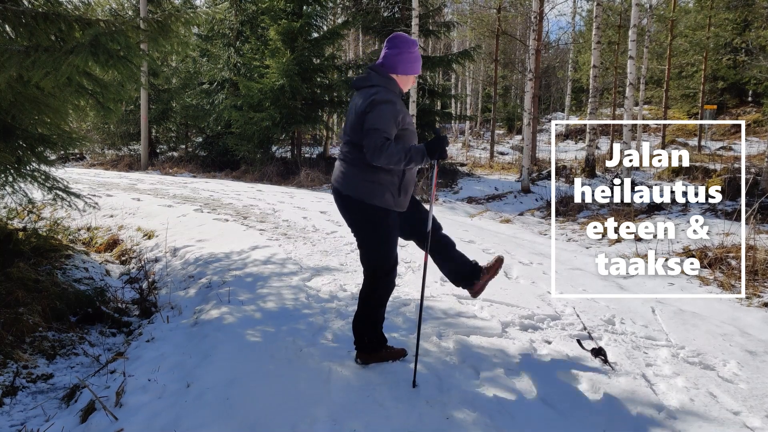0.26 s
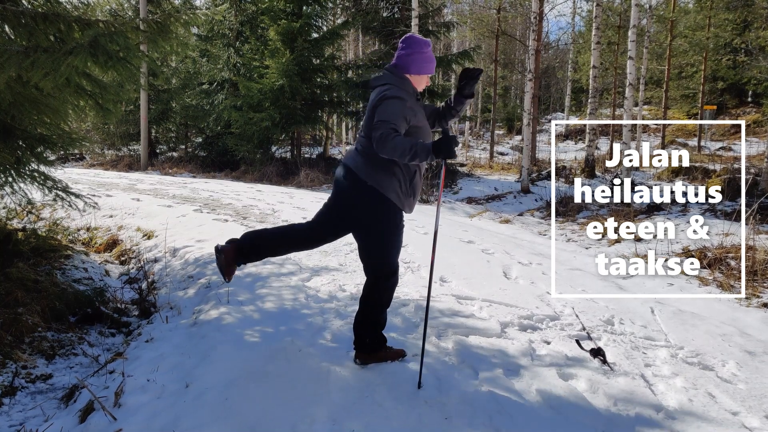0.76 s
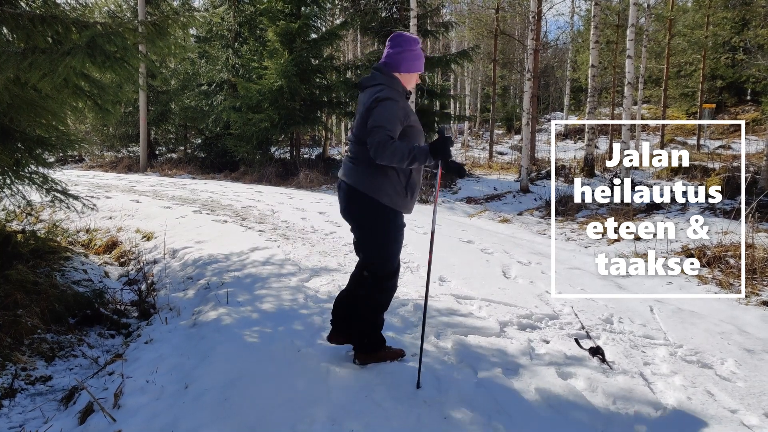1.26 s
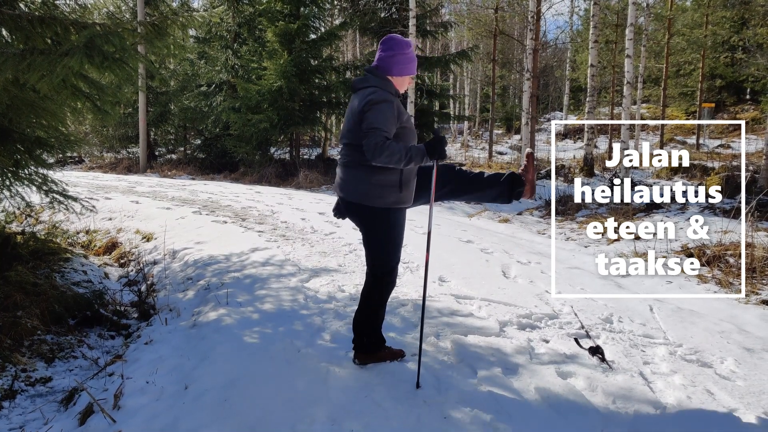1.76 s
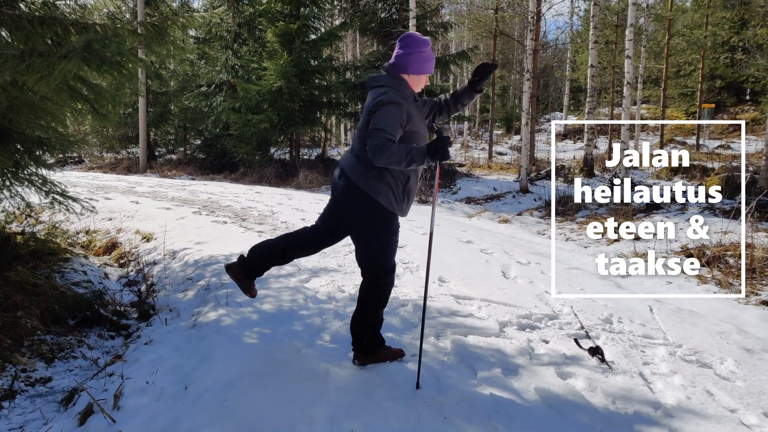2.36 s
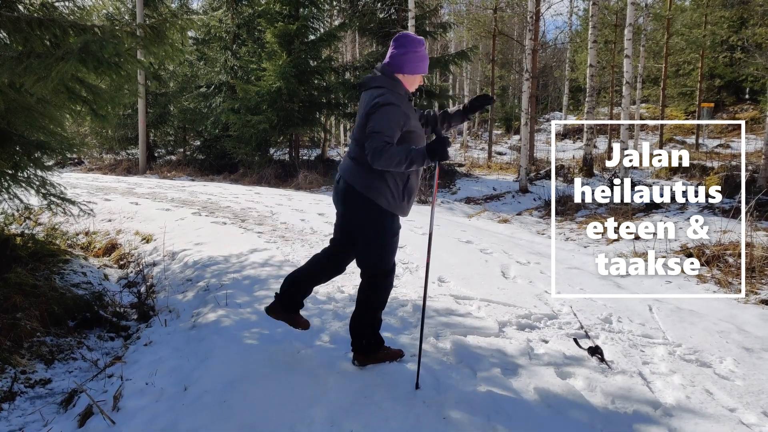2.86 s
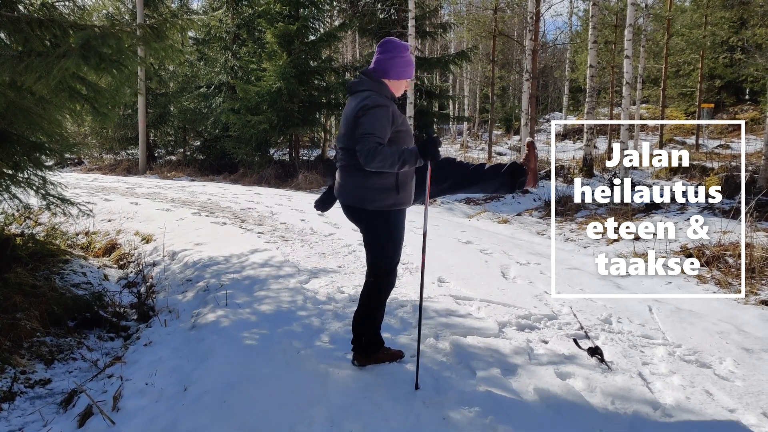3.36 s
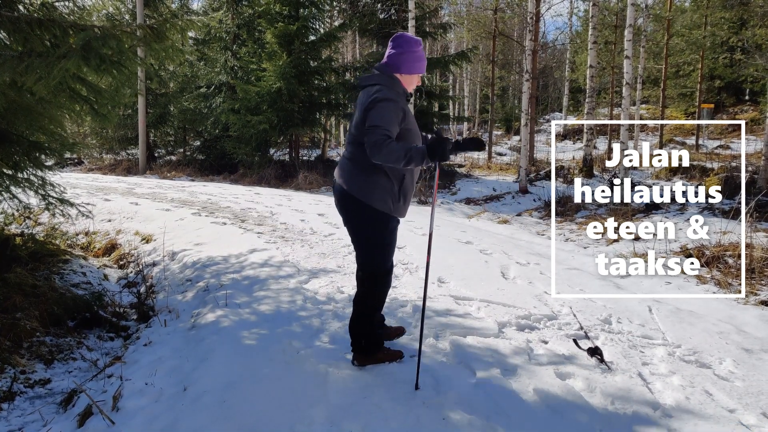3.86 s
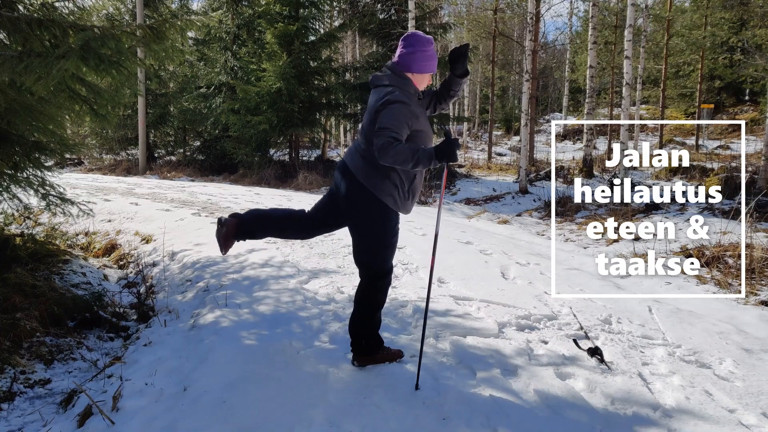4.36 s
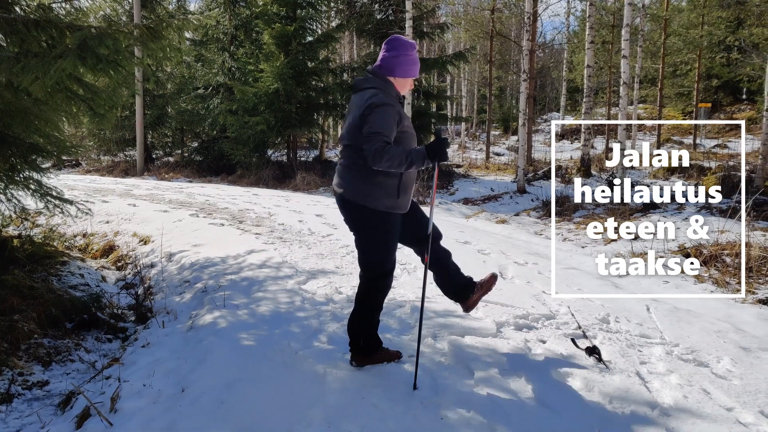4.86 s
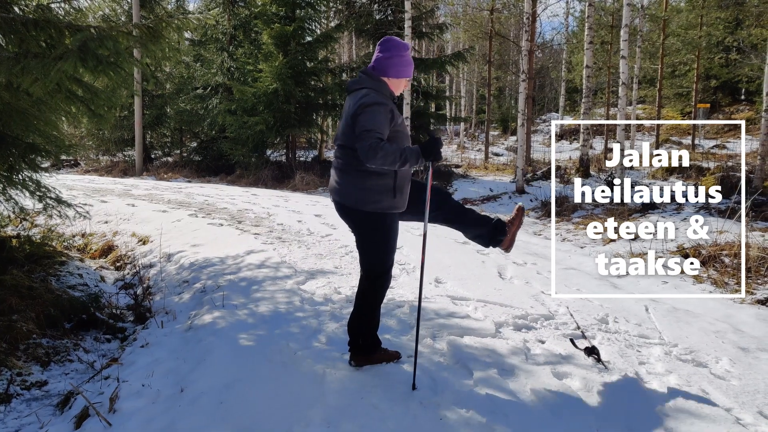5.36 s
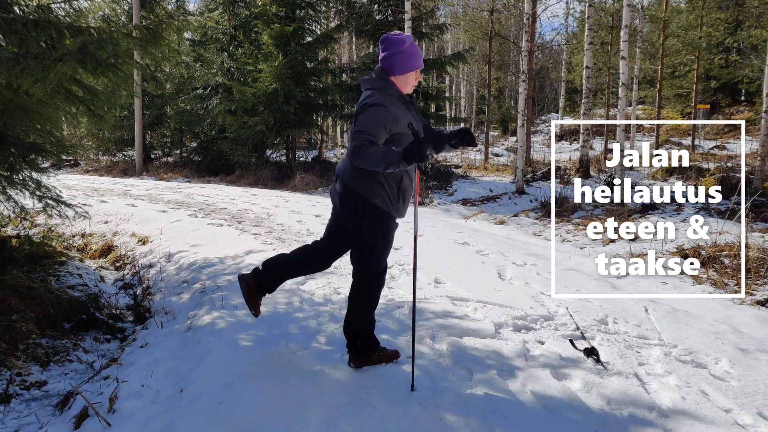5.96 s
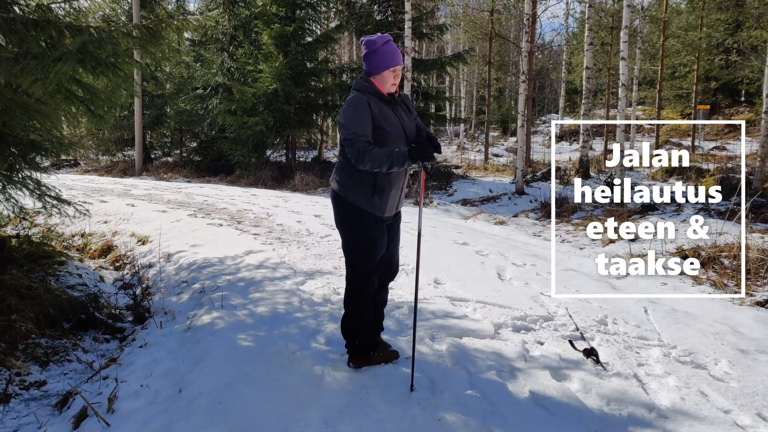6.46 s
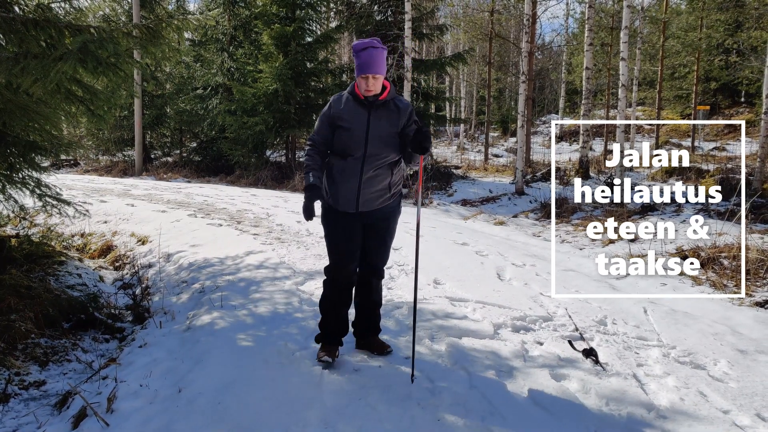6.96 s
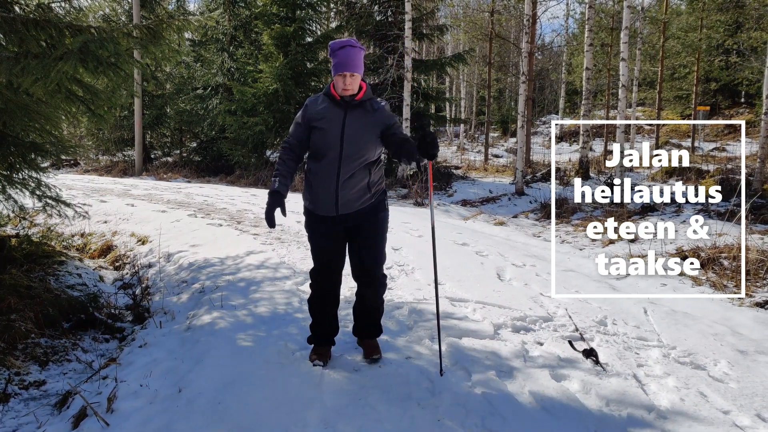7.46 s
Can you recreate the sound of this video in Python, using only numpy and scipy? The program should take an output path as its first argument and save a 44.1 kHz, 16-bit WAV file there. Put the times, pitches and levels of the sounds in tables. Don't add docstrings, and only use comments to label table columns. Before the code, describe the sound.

Outdoors in a wood, a nearby small bird sings five quick falling two-note whistles while low wind bumps shake the right side and a pole taps twice. The song stops; faint thin bird calls answer far off. Nine more phrases follow, growing louder, then only soft rustling, distant whistles and hiss remain. Stereo microphone, right side open, left muffled with small ticks.

```python
import sys
import numpy as np
from scipy import signal
from scipy.fft import rfft, irfft
from scipy.io import wavfile
from scipy.ndimage import uniform_filter1d, map_coordinates

SR = 44100
rng = np.random.default_rng(int(sys.argv[2]) if len(sys.argv) > 2 else 0)


def output_pcm(signal):
    pcm = np.clip(np.atleast_2d(signal).T, -1, 1) * 32767
    wavfile.write(sys.argv[1], SR, np.round(pcm).astype(np.int16))


def gain_from_db(level_db):
    decades = np.asarray(level_db, float) / 20
    return 10 ** decades


N = 339981

# (time [s], extra scatter from the trees [dB], overtone level [dB])
HEAD_TURNS = [(0, 1, -48), (.35, 3, -50), (.7, -2, -47), (.85, 1, -49), (1.0, 4, -52), (1.2, 3, -52),
              (1.4, -2, -46), (1.55, 0, -52), (3.25, -3.5, -44), (3.7, -1, -48), (3.95, -4, -58),
              (4.3, -1, -52), (4.6, -2.5, -50), (4.75, -3.5, -33), (5.0, -5, -45), (5.5, -3, -48),
              (5.75, -4.5, -47), (6.06, -7, -41), (6.2, -4.5, -41)]


def in_time(rows):
    s, *columns = np.transpose(rows)
    return [np.interp(np.arange(N) / SR, s, c) for c in columns]


def rms_one(x):
    return x / np.sqrt(np.mean(x ** 2) + 1e-20)


def lowpass(x, hz, order):
    return signal.sosfilt(signal.butter(order, hz, fs=SR, output="sos"), x)


def band(x, low_hz, high_hz, order=2):
    edges = np.clip([low_hz, high_hz], 5, .45 * SR)
    return signal.sosfilt(signal.butter(order, edges, "band", fs=SR, output="sos"), x)


def drift(rate):
    steps = rng.standard_normal(400)
    return map_coordinates(steps, [np.arange(N) / SR * rate + 2], order=3)


def coloured(spectrum):
    hz, level_db = np.transpose(spectrum)
    bins = np.maximum(np.arange(N // 2 + 1) * SR / N, 40)
    density_db = np.interp(np.log(bins), np.log(hz), level_db) - 100
    shape = gain_from_db(density_db) * np.sqrt(SR / 2)
    return irfft(rfft(rng.standard_normal(N)) * shape, N)


def steady(x, span_s):
    power = uniform_filter1d(x ** 2, size=round(span_s * SR))
    return x / np.sqrt(power + .05 * np.mean(power))


def add(out, piece, at_s):
    start = round(at_s * SR) - len(piece) // 2
    low, high = np.clip([start, start + len(piece)], 0, N)
    out[low:high] += piece[low - start:][:high - low]


def impulses(rows):
    clicks = np.zeros(N)
    for s, peak_db in rows:
        clicks[round(s * SR)] = gain_from_db(peak_db)
    return clicks + 1e-18


def pushes(rows):
    t = np.arange(N) / SR
    return sum(sign * gain_from_db(peak_db) * np.exp(-((t - s) / width) ** 2) for s, peak_db, sign, width in rows)


def birds():
    # (share of length, pitch ratio, level below the peak [dB])
    high_shape = [(0, 1.504, -15), (.15, 1.32, -9), (.34, 1.17, -9), (.54, 1.045, -2), (.79, 1, 0.5),
                  (.93, 1, 0.5), (1, 1.015, -10)]
    # (time [s], length [s], pitch [Hz], peak level [dB], swell from start to end [dB])
    high_notes = [(-.041, 0.062, 5300, -27.5, -12), (0.299, 0.064, 5430, -32.5, 5),
                  (0.638, 0.067, 5314, -30, 0), (0.996, 0.062, 5260, -30, -1),
                  (1.352, 0.051, 5376, -30.5, 0.5), (3.193, 0.06, 5340, -36, -1),
                  (3.522, 0.058, 5220, -32.5, -0.5), (3.879, 0.05, 5200, -30.5, 0),
                  (4.226, 0.067, 5320, -31.5, -5), (4.589, 0.057, 5190, -30.5, -1.5),
                  (4.932, 0.065, 5326, -24.5, -1), (5.3, .061, 5257, -26, -5.3),
                  (5.665, 0.056, 5290, -28, 1), (6.033, 0.061, 5320, -25, -3)]
    # (share of length, pitch ratio, level below the peak [dB])
    low_shape = [(0, 1.115, -15), (.07, 1.055, -8), (.15, 1.035, -4), (.3, 1, 0), (.5, .958, -3),
                 (.75, .908, -7), (1, .866, -11)]
    # (time [s], length [s], pitch [Hz], peak level [dB], swell from start to end [dB])
    low_notes = [(0.058, 0.135, 4830, -38, -3), (0.4, 0.132, 4800, -33.5, 1),
                 (0.749, 0.15, 4726, -34, -3.5), (1.099, 0.14, 4697, -35, -2.5),
                 (1.454, 0.15, 4690, -34, -3), (3.298, 0.118, 4830, -37.5, 1.5),
                 (3.627, 0.15, 4670, -39.5, -0.5), (3.977, 0.13, 4715, -31.5, -1),
                 (4.33, 0.14, 4807, -31.5, -2.5), (4.694, 0.13, 4727, -32, 1.5),
                 (5.039, 0.14, 4728, -28, -0.5), (5.407, 0.14, 4787, -30, -0.5),
                 (5.771, 0.15, 4820, -28.5, 1), (6.145, 0.13, 4725, -27.5, -4)]
    # (share of length, pitch ratio, level below the peak [dB])
    hook_shape = [(0, .6, -24), (.1, 1.015, -6), (.55, 1, 0), (.75, .96, -4), (.9, .88, -11), (1, .8, -20)]
    # (time [s], length [s], pitch [Hz], peak level [dB], swell from start to end [dB])
    hooks = [
        (1.914, 0.07, 7720, -57, 2),
        (2.046, .062, 7430, -56, 0),
    ]
    # (share of length, pitch ratio, level below the peak [dB])
    slide_shape = [(0, 1.095, -7), (.16, 1.045, -2), (.4, 1, 0.5), (.84, .935, -2), (.93, .9, -4),
                   (1, 0.8, -10)]
    # (time [s], length [s], pitch [Hz], peak level [dB], swell from start to end [dB])
    slides = [
        (2.609, 0.13, 6440, -59, 1),
        (2.848, 0.14, 5980, -66, 3),
        (3.07, 0.04, 5600, -73, 3),
        (6.878, .11, 6300, -63, 1),
        (7.091, 0.16, 6200, -60.5, 2),
        (7.313, 0.058, 5850, -66, 1),
    ]
    near = np.zeros(N)
    head_s, _, overtone_db = np.transpose(HEAD_TURNS)
    for shape, notes, release_s, chip_below_db in [(high_shape, high_notes, .002, -32),
                                                   (low_shape, low_notes, .006, -29)]:
        for row in notes:
            s, peak_db = row[0], row[3]
            facing_db = np.interp(s, head_s, overtone_db)
            chip_db = peak_db + chip_below_db + 0.3 * (facing_db + 59)
            add(near, *whistle(sung(shape, *row), .0024, facing_db, release_s))
            chip = [(s - .006, 6400, chip_db), (s - .003, 7900, chip_db)]
            add(near, *whistle(chip, fade_s=.00027, overtone_db=-60, release_s=.0011))
            if shape is low_shape:
                upswing = [(s - .005, 4300, chip_db - 4), (s, 5300, chip_db + 1)]
                add(near, *whistle(upswing, fade_s=.0008, overtone_db=-60, release_s=.001))
    wavering = np.arange(N) + 3.5 * drift(35)
    near = map_coordinates(near, [wavering], order=3)
    near *= gain_from_db(1.8 * drift(45))
    far = np.zeros(N)
    for shape, notes in [(hook_shape, hooks), (slide_shape, slides)]:
        for row in notes:
            add(far, *whistle(sung(shape, *row), fade_s=.003, overtone_db=-60))
    return near + far * gain_from_db(3 * drift(50))


def sung(shape, s, length, pitch_hz, peak_db, swell_db):
    share, ratio, level_db = np.transpose(shape)
    swell = swell_db * (2 * share - 1)
    return np.transpose([s + length * share, pitch_hz * ratio, peak_db + level_db + swell])


def whistle(note, fade_s, overtone_db, release_s=0.0038):
    # (time [s], width [s], pitch shift [Hz], level shift [dB])
    slips = [(0.318, 0.02, -170, -2), (.41, 0.011, 289, 3), (.703, 0.0058, 130, -8),
             (.752, 0.0061, -160, 2), (.812, 0.0055, -37, -4), (1.02, 0.017, 159, 1),
             (1.114, 0.0057, -120, 4), (1.137, .014, -46, -1.5), (1.41, 0.0084, 250, 15),
             (3.203, .01, -300, -7.5), (3.541, 0.011, 66, -7.5), (3.705, 0.013, 73, 5.5),
             (3.742, 0.0093, -110, 1.5), (3.889, 0.0096, -170, -5), (3.934, 0.0039, 373, 21),
             (4.013, 0.012, -130, 0), (4.041, 0.014, 76, 2), (4.243, 0.011, -170, 0),
             (4.342, 0.034, -16, -10), (4.597, 0.0083, -270, 0), (4.618, 0.012, 172, 2.5),
             (4.698, 0.0094, -170, 3), (4.951, 0.006, -150, -3), (5.417, 0.007, -210, -8),
             (5.48, 0.0096, 60, 2.5), (6.055, 0.013, -150, -2), (6.097, 0.0059, 200, 6),
             (6.148, 0.01, -120, -4), (6.168, 0.021, 210, -2.2), (1.103, 0.0044, 250, 4),
             (1.113, 0.0035, 0, -8), (1.126, 0.0056, 227, 3.5), (3.68, 0.011, -87, 1.5),
             (4.09, 0.018, 57, 3), (.52, .01, -40, -8), (.76, .008, 2, -4), (3.765, .012, 0, 4),
             (3.302, .006, 250, 2), (.525, .025, 80, 0), (.88, .025, 90, 0), (3.74, .012, 58, 1),
             (4.058, .008, -58, -1), (5.771, 0.0096, 202, 4), (5.43, 0.013, 60, -1), (5.17, 0.0037, 0, -4),
             (3.556, 0.0049, 0, -3.5), (5.361, 0.0034, 150, 7), (5.72, 0.0049, 100, 1.5),
             (3.585, 0.0035, 100, -2), (5.85, 0.016, 4, 4)]
    s, hz, level_db = np.transpose(note)
    t = np.arange(s[0] - fade_s, s[-1] + 5 * release_s, 1 / SR)
    at, width, shift_hz, shift_db = np.transpose(slips)
    slipping = np.exp(-((t[:, None] - at) / width) ** 2)
    glide = uniform_filter1d(np.interp(t, s, hz) + slipping @ shift_hz, size=160)
    phase = 2 * np.pi * np.cumsum(glide) / SR
    attack = np.clip((t - t[0]) / (2 * fade_s), 0, 1) ** 2
    release = np.exp(-np.maximum(t - s[-1], 0) / release_s)
    tone = np.sin(phase) + gain_from_db(overtone_db) * np.sin(2 * phase)
    level = np.sqrt(2) * gain_from_db(np.interp(t, s, level_db) + slipping @ shift_db)
    return level * attack * release * tone, t.mean()


def trees(x):
    # (time [s], width [s], lag [s], level [dB])
    trunk_echoes = [
        (1.058, .012, .078, -7),
        (1.125, .035, .011, -2),
        (3.66, .03, .06, -11),
        (3.7, .03, .09, -14),
        (1.96, .03, .012, -4),
    ]
    wash_t60_s, linger_t60_s, bloom_s = 0.66, 0.55, .012
    wash_db, linger_db, near_echo_db = -3.2, -6, -9
    t = np.arange(SR) / SR
    wash = rng.standard_normal(SR) * gain_from_db(-60 * t / wash_t60_s) * (1 - np.exp(-t / 0.0031))
    highs_left = gain_from_db(-60 * t / 1.5)
    wash = wash * highs_left + band(wash, 300, 4700) * (1 - highs_left)
    wash = wash - 0.62 * band(wash, 4200, 5130, order=1)
    lows = rng.standard_normal(SR) * gain_from_db(linger_db - 60 * t / linger_t60_s) * (1 - np.exp(-t / 0.023))
    wash = wash + band(lows, 4020, 4330)
    early = rng.standard_normal(SR) * (rng.random(SR) < .03) * gain_from_db(-60 * t / .12)
    early = early * (1 - np.exp(-t / bloom_s))
    answer = gain_from_db(wash_db) * wash / np.linalg.norm(wash)
    answer = answer + gain_from_db(near_echo_db) * early / np.linalg.norm(early)
    answer = answer - .66 * band(answer, 5100, 5550, order=1)
    answer = answer - 0.2 * band(answer, 6800, 8800, order=1)
    scattered = signal.fftconvolve(x * gain_from_db(in_time(HEAD_TURNS)[0]), answer)[:N]
    swaying = np.arange(N) + 2.5 * drift(48)
    out = x + map_coordinates(scattered, [swaying], order=3)
    now = np.arange(N) / SR
    for s, width, lag, echo_db in trunk_echoes:
        moment = x * np.exp(-((now - s) / width) ** 2)
        out += gain_from_db(echo_db) * np.roll(moment, round(lag * SR))
    return out


def chatter():
    # (time [s], length [s], start pitch [Hz], end pitch [Hz], peak level [dB])
    chirps = [(0.265, 0.065, 2940, 3910, -53.5), (0.324, 0.053, 3190, 4030, -49.5),
              (0.402, 0.056, 2980, 3900, -51), (0.47, 0.048, 2900, 3700, -55),
              (.545, 0.053, 2990, 3750, -55.5), (0.612, .035, 2800, 3340, -57),
              (.655, 0.06, 3080, 3670, -57), (4.15, 0.05, 3170, 4000, -61), (4.227, 0.046, 3230, 4100, -60),
              (4.295, 0.06, 3200, 3950, -61), (2.179, 0.036, 3500, 4440, -61),
              (2.242, .03, 3500, 4200, -63), (.262, .04, 2300, 3000, -58), (.55, .04, 2300, 2900, -59),
              (.335, .03, 3700, 4300, -56), (.635, .04, 3300, 3900, -60)]
    blur_hz = 300
    out, draws = np.zeros(N), rng.standard_normal((len(chirps), 2, 6000))
    for (s, length, start_hz, end_hz, peak_db), noise in zip(chirps, draws):
        size = round(1.7 * length * SR)
        tear = rms_one(lowpass(noise, blur_hz, 2))[:, -size:]
        phase = 2 * np.pi * np.cumsum(np.linspace(start_hz, end_hz, size)) / SR
        chirp = tear[0] * np.sin(phase) + tear[1] * np.cos(phase)
        add(out, gain_from_db(peak_db) * chirp * np.hanning(size), s)
    return out


def rustles():
    # (time [s], length [s], centre
    # [Hz], width [Hz], peak level [dB])
    puffs = [(.83, .008, 6600, 700, -55), (0.334, .02, 2300, 600, -60), (0.554, .03, 2400, 700, -60),
             (.55, .03, 6000, 4000, -54), (2.32, .05, 5000, 2500, -62), (6.481, .016, 5800, 4000, -59),
             (6.7, .06, 6570, 4000, -65), (6.86, .04, 6000, 3500, -65), (7.18, .06, 6500, 4500, -65),
             (3.235, 0.012, 3300, 2000, -57), (2.27, 0.28, 5500, 4600, -67), (4.549, 0.14, 3240, 1300, -64),
             (4.996, 0.041, 9000, 9000, -61), (5.006, 0.056, 3240, 1530, -59),
             (5.305, 0.011, 9900, 8000, -58), (6.766, 0.055, 6150, 4500, -55),
             (6.955, 0.41, 6960, 4000, -65), (7.518, 0.022, 7660, 8000, -59.5),
             (7.664, 0.024, 6500, 5000, -58.5), (3.28, .04, 3200, 1600, -63),
             (4.688, .006, 7200, 1800, -48), (6.139, .006, 6900, 3400, -49), (1.454, .006, 7400, 1600, -53),
             (1.377, .008, 7400, 1400, -53), (1.005, .006, 5200, 2600, -53), (.992, .008, 7000, 2400, -56),
             (1.262, .006, 6800, 3400, -59), (4.327, .006, 7900, 3000, -52), (3.62, .008, 7400, 1400, -54),
             (3.515, .008, 7000, 1800, -55), (.151, .005, 6000, 5000, -56), (5.293, .008, 6800, 2200, -52),
             (2.045, .006, 5500, 4000, -62), (5.345, .006, 3600, 2400, -56)]
    out, draws = np.zeros(N), rng.standard_normal((len(puffs), 2, 30000))
    for (s, length, hz, width_hz, peak_db), (noise, grain) in zip(puffs, draws):
        size = min(round(2 * length * SR), 30000)
        grainy = noise * gain_from_db(4.4 * grain)
        puff = rms_one(band(grainy, hz - width_hz / 2, hz + width_hz / 2, order=3))
        add(out, gain_from_db(peak_db) * puff[-size:] * np.hanning(size), s)
    return out


def taps():
    # (time [s], peak level [dB])
    pole_clicks = [
        (.151, -22.5),
        (0.164, -24),
    ]
    clicks = impulses(pole_clicks)
    return 14 * band(clicks, 620, 1300) + 7 * band(clicks, 2260, 2550)


def buffets():
    # (time [s], peak level [dB], centre [Hz], width [s])
    eddies = [(0.091, -18, 152, 0.017), (0.153, -24, 154, 0.0066), (0.197, -12.5, 137, 0.023),
              (0.242, -17.5, 132, 0.0097), (0.266, -7.5, 143, 0.015), (0.287, -7.5, 291, 0.011),
              (0.301, -8.5, 170, 0.02), (0.328, -11.5, 139, 0.011), (0.411, -10, 120, 0.013),
              (0.435, -17.5, 200, 0.013), (0.468, -22.5, 101, 0.0093), (0.566, -23.5, 135.5, 0.0097),
              (0.625, -16, 128, 0.0094), (0.667, -21.5, 151, 0.013), (0.715, -16.5, 270, 0.011),
              (0.728, -11, 104.7, 0.022), (0.797, -26, 102, 0.019), (1.119, -32.5, 132, 0.029),
              (1.193, -24.5, 119.5, 0.02), (1.346, -27, 93, 0.017), (1.409, -24.5, 135, 0.0093),
              (1.499, -29, 87, 0.022), (1.714, -29, 106, 0.016), (1.761, -15.5, 234, 0.0067),
              (1.777, -16.5, 105.4, 0.011), (1.954, -25, 140, 0.011), (2.783, -32, 101, 0.013),
              (3.767, -52, 91, 0.022), (5.246, -37, 116, 0.041), (5.57, -39, 141, 0.0093),
              (6.9, -48, 149, .03), (7.2, -44.5, 167, 0.034), (2.1, -41, 100, 0.021)]
    out, draws = np.zeros(N), rng.standard_normal((len(eddies), 9000))
    for (s, peak_db, hz, width), noise in zip(eddies, draws):
        size = round(2.2 * width * SR)
        cycles = steady(band(noise, 0.752 * hz, 1.218 * hz), 1 / hz)
        edge = rms_one(band(noise, 1.95 * hz, 2.336 * hz, order=3))
        shake = (cycles + gain_from_db(-17.0) * edge)[-size:] * np.hanning(size)
        add(out, gain_from_db(peak_db) * shake / np.abs(shake).max(), s)
    return lowpass(out, 620, 4)


def shoves():
    # (time [s], peak level [dB], sign, width [s])
    swings = [
        (1.743, -26, -1, .004),
        (1.751, -21, 1, .004),
        (1.947, -19, -1, .002),
        (2.093, -30, -1, .004),
        (2.101, -27, 1, .004),
        (1.825, -29, -1, .005),
        (1.769, -24, -1, .002),
        (1.72, -30, -1, .003),
    ]
    return pushes(swings)


def covered_port():
    # (time [s], peak level [dB], sign, width [s])
    presses = [
        (2.768, -21, -0.92, 0.0029),
        (2.779, -18.5, 0.78, 0.0051),
        (3.167, -14.5, 0.7, 0.0029),
        (5.592, -21.5, 0.62, 0.0028),
        (.69, -38, 1, .0015),
        (.74, -41, -1, 0.0019),
        (1.241, -33, 1, .002),
        (5.1, -40, 1, .0018),
        (5.62, -39, -0.8, 0.0013),
    ]
    # (time [s], peak level [dB])
    ticks = [
        (3.656, -46),
        (3.670, -31),
        (3.991, -22),
        (5.995, -31.5),
        (6.877, -40),
    ]
    port_hz, ring_t60_s = 14800, 0.0015
    clicks = impulses(ticks)
    r, w = gain_from_db(-60 / (ring_t60_s * SR)), 2 * np.pi * port_hz / SR
    ring = signal.lfilter([1, -.5], [1, -2 * r * np.cos(w), r * r], clicks)
    step = signal.lfilter([.35], [1, -.985], clicks)
    return pushes(presses) + 0.94 * ring + step


def gusting():
    # (time [s], left rms level [dB], right rms level [dB])
    slow_wind = [(0, -34.5, -33.5), (.2, -45, -24), (.7, -31.5, -28.5), (.98, -41.5, -40.5),
                 (1.2, -29.5, -31.5), (1.54, -46, -39.5), (1.8, -37, -34.5), (2.1, -40.5, -39),
                 (2.5, -43, -49), (3.0, -49.5, -51.5), (3.5, -38, -51), (4.2, -43.5, -51),
                 (4.8, -40.5, -42.5), (5.3, -35, -44.5), (5.9, -38.5, -48), (6.4, -48.5, -50),
                 (7.0, -51, -54), (7.71, -60, -52)]
    # (time [s], width [s], left rise [dB], right rise [dB])
    gusts = [
        (2.75, 0.089, 4, 10),
        (3.21, 0.091, 13, 5),
        (3.779, 0.068, 3.5, 21.5),
        (4.06, 0.017, 13.5, 12),
        (5.18, 0.13, 1.5, 9),
        (5.6, 0.098, 12.5, 8),
        (6.02, 0.098, -6, 4.5),
        (6.3, 0.12, 11, -4),
        (7.14, 0.045, 3, 7),
        (7.5, 0.3, 13.5, 1.5),
    ]
    level_db, t = np.array(in_time(slow_wind)), np.arange(N) / SR
    for s, width, left_db, right_db in gusts:
        level_db = level_db + np.outer([left_db, right_db], np.exp(-((t - s) / width) ** 2))
    return level_db


def wind(level_db, low_hz, top_hz, knee_hz):
    rumble = band(rng.standard_normal(N + SR), low_hz, top_hz, order=1)
    rumble = lowpass(rumble, knee_hz, 2)[SR:]
    lumps = gain_from_db(2.5 * drift(18))
    return gain_from_db(level_db) * rms_one(steady(rumble, 0.16) * lumps)


def forest(gain):
    # (frequency [Hz], level per Hz [dB])
    murmur_spectrum = [(60, 3), (150, 17.5), (330, 18), (600, 18), (1200, 13), (2200, 4.5), (3500, 0.5),
                       (6500, -0.5), (8200, -3), (9000, -8.5), (12500, -8), (15000, -8.5), (15790, -8),
                       (15830, -61)]
    # (time [s], width [s], share lost)
    lulls = [
        (1.86, 0.15, 0.52),
        (2.72, 0.23, 0.68),
        (4.52, 0.085, 0.45),
    ]
    murmur, t = coloured(murmur_spectrum), np.arange(N) / SR
    lost = sum(share * np.exp(-((t - s) / width) ** 2) for s, width, share in lulls)
    haze = band(murmur, 3800, 13400, order=1)
    return gain ** 1.06 * (murmur - lost * haze)


def road(road_db):
    hum = rms_one(band(rng.standard_normal(N), 245, 488))
    return gain_from_db(road_db - 0.5) * hum * gain_from_db(2.0 * drift(6))


def scene():
    # (time [s], gain heard as hiss level [dB], far road hum level [dB])
    floor = [(0, -69.5, -52.5), (.29, -69.5, -41.5), (.57, -68.5, -49.5), (1.14, -69.5, -53.5),
             (1.43, -68, -57), (1.71, -67, -52), (2.28, -70, -51.5), (2.57, -71.5, -59), (2.86, -71, -59),
             (3.14, -72, -56.5), (3.43, -69.5, -53), (4.3, -70, -52.5), (4.85, -69, -52),
             (5.71, -68.5, -45.5), (6.28, -70, -49.5), (6.57, -72.5, -52.5), (6.85, -73, -54.5),
             (7.71, -73, -54)]
    # (frequency [Hz], level per Hz [dB])
    hiss_spectrum = [(60, 17.5), (150, 9.5), (330, 1.5), (600, -2), (1200, -5.5), (2200, -8.5), (3500, -10),
                     (4500, -19), (5500, -27), (6800, -15), (8000, -12.5), (12500, -7.5), (14800, -3),
                     (15790, -3), (15830, -60)]
    duck_s, duck_db, recover_s = 1.77, -3, .15
    left_db, right_db = gusting()
    hiss_db, road_db = in_time(floor)
    since = np.arange(N) / SR - duck_s
    duck = duck_db * (since > 0) * np.exp(-np.abs(since) / recover_s)
    gain = gain_from_db(hiss_db + 71.5 + duck)
    left = gain * coloured(hiss_spectrum) + wind(left_db, 4.9, 11.2, 41.6) + covered_port()
    right = trees(birds()) + chatter() + rustles() + taps()
    right += buffets() + shoves() + wind(right_db, 26.0, 72.0, 80)
    right += forest(gain) * gain_from_db(0.12 * drift(2.08)) + road(road_db)
    return np.array([left, right])


def low_pass(x):
    return signal.sosfilt(signal.butter(12, 16840, fs=SR, output="sos"), x)


def record(dry):
    cut = signal.sosfilt(signal.cheby2(10, 60, 17000, fs=SR, output="sos"), dry)
    return low_pass(cut)


dry = scene()
out = record(dry)
output_pcm(out)
```